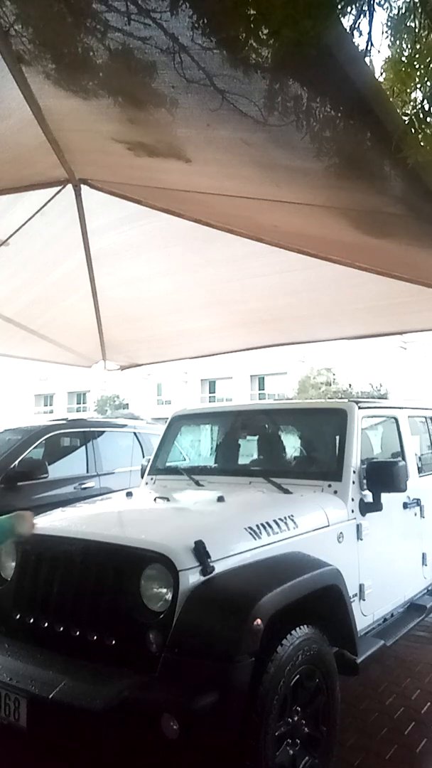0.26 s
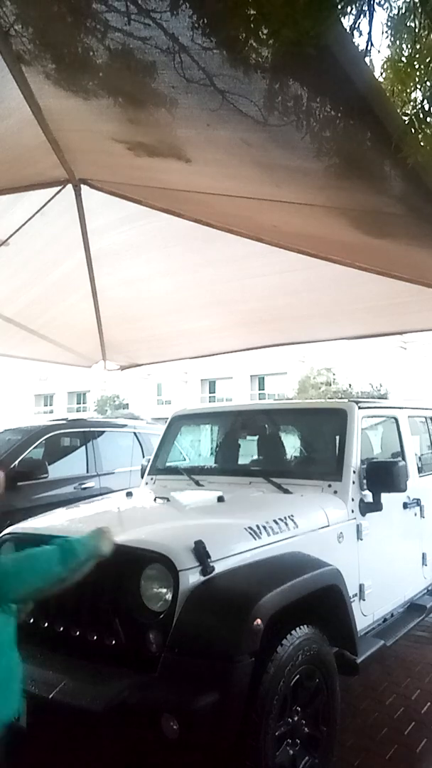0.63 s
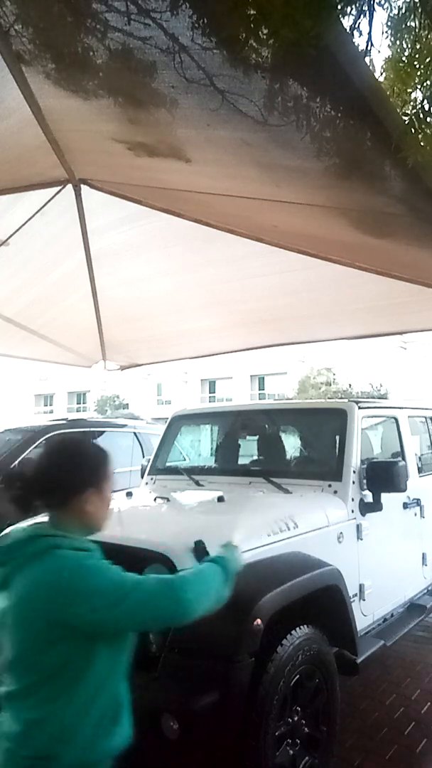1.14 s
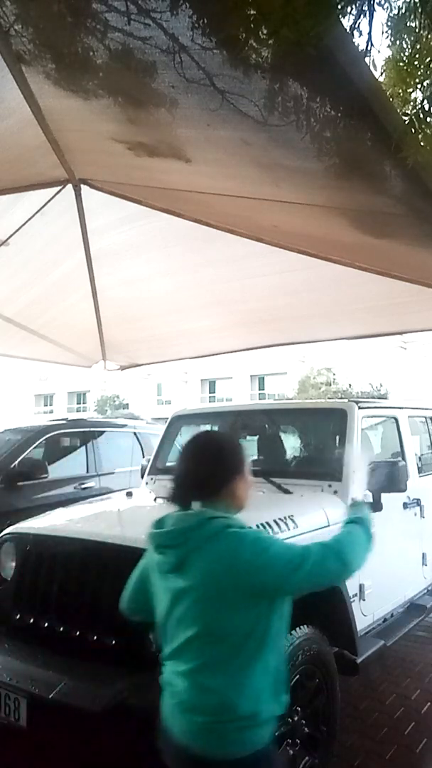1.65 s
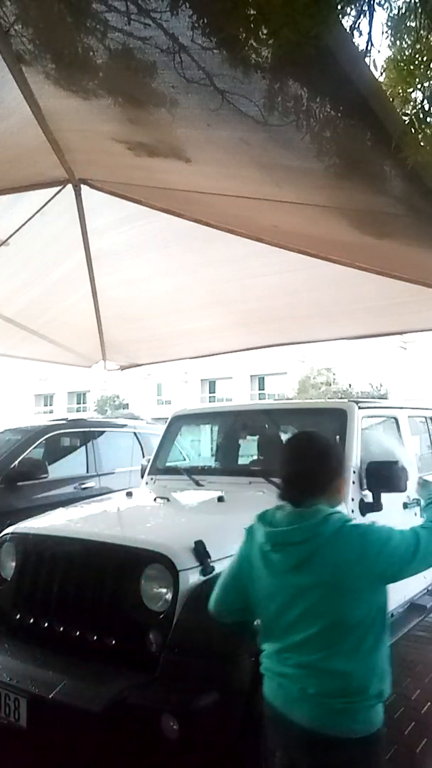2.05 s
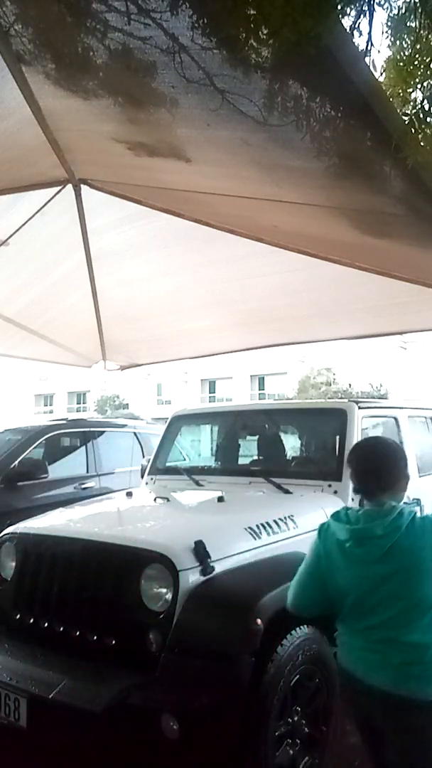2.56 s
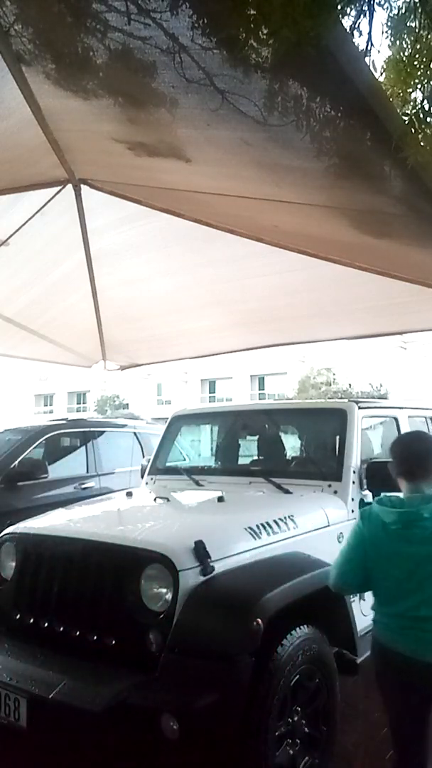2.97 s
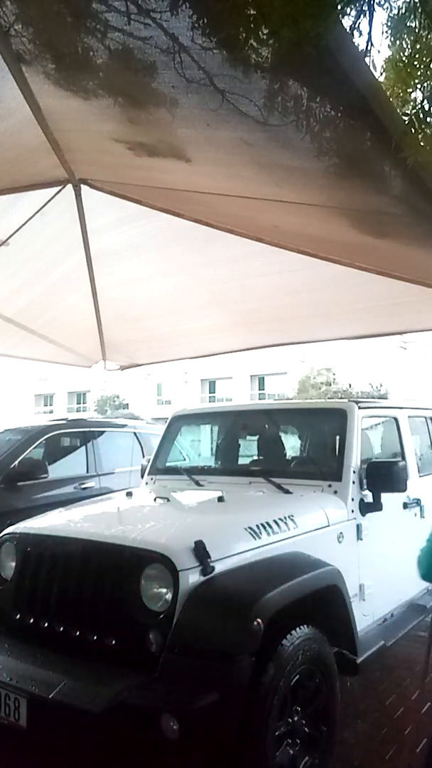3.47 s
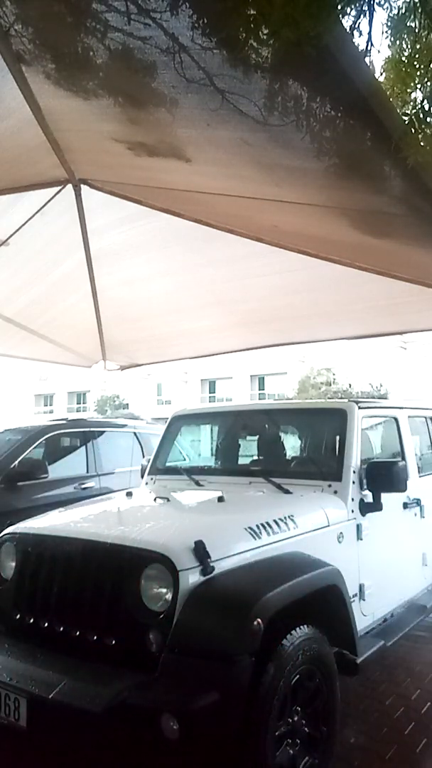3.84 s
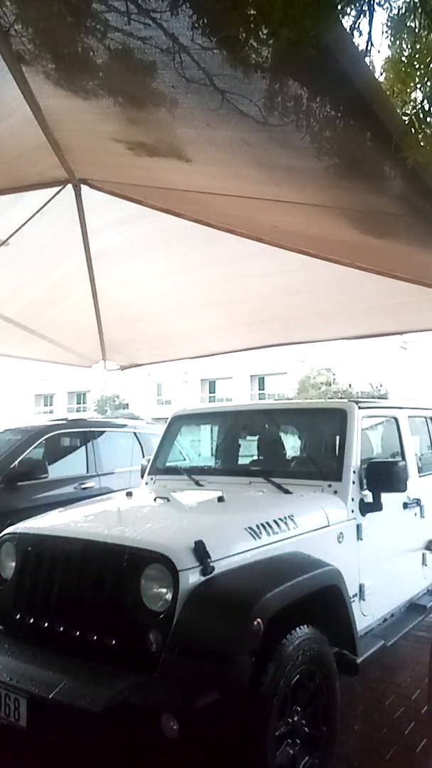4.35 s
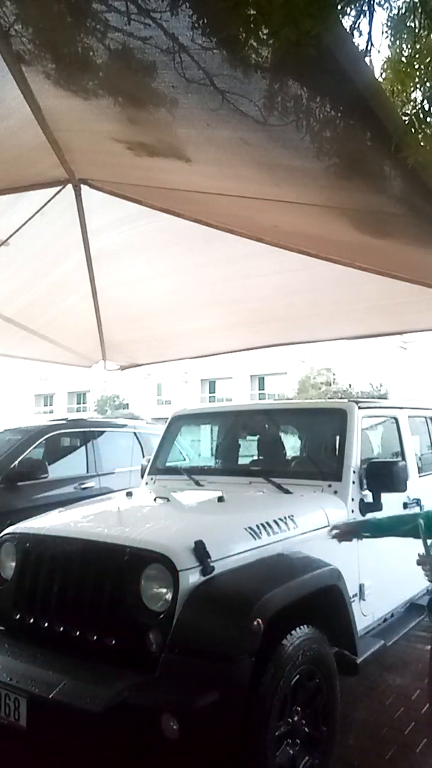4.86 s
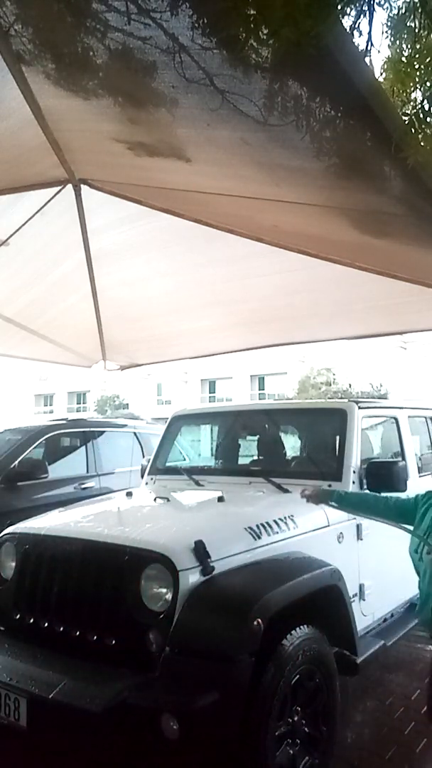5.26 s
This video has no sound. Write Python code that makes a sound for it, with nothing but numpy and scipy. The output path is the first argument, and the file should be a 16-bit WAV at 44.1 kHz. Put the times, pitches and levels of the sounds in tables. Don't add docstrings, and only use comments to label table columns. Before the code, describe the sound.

A garden hose sprays a parked car under a fabric canopy. Bright, crackling spatter and fine hiss flutter in irregular surges, with single drops ticking sharply. Around the middle and later the jet strikes sheet metal in short hollow drumming blows, then the spray thins to sparse patter. Faint traffic and water runoff rumble below. A phone a few metres away captures it in stereo, the right side brighter and louder.

```python
import sys
import numpy as np
from scipy import signal
from scipy.fft import rfft, irfft
from scipy.io import wavfile
from scipy.ndimage import uniform_filter1d

SR = 44100
rng = np.random.default_rng(int(sys.argv[2]) if len(sys.argv) > 2 else 0)


def amplitude_ratio(level_db):
    exponent = np.asarray(level_db, float) / 20
    return 10 ** exponent


def wav_out(sig):
    wavfile.write(sys.argv[1], SR, np.round(np.clip(np.atleast_2d(sig).T, -1, 1) * 32767).astype(np.int16))


N = 242991
TIME = np.arange(N) / SR
HZ = np.arange(N // 2 + 1) * SR / N + 1


def along(table, column=1):
    rows = np.array(table, float)
    return np.interp(np.log(HZ), np.log(rows[:, 0]), rows[:, column])


def colour(x, table):
    inside = (HZ > table[0][0]) & (HZ < table[-1][0])
    y = irfft(rfft(x) * amplitude_ratio(along(table)) * inside, N)
    right_rms = np.sqrt(np.mean(y[1] ** 2))
    return y / right_rms


# (frequency [Hz], shading [dB], likeness [0-1])
PORT = [(60, -2.5, 1), (505, -2.5, 0.94), (1020, -4.5, 0.28), (2850, -2.5, 0.32), (4000, -7.5, 0.12),
        (6000, -5, 0), (8000, -13, 0.1), (9200, -7.5, 0), (11050, -19, 0.1), (13500, -43, .1),
        (15000, -37, .1)]


def pair():
    like = np.clip(along(PORT, column=2), 0, 1)
    right, other = rfft(rng.standard_normal((2, N)))
    left = like * right + np.sqrt(1 - like ** 2) * other
    return irfft(np.array([left, right]), N)


def walk(rate_hz):
    hold = int(SR / rate_hz)
    steps = np.repeat(rng.standard_normal(N // hold + 1), hold)
    smooth = uniform_filter1d(uniform_filter1d(steps, hold), hold)
    return 1.15 * smooth[:N]


def fade(x, ms):
    return signal.lfilter([1], [1, -np.exp(-1000 / (ms * SR))], x)


def patter(rate, spread_db, ms):
    chance, luck = rng.random((N, 2)).T
    size = amplitude_ratio(-2 * spread_db * np.log(1 - luck))
    power = fade((chance < rate / SR) * size, ms)
    return power / power.mean()


# (frequency [Hz], density [dB per Hz])
TOWN = [(18, -73), (30, -31), (93, -4), (130, -8), (173, -6.5), (269, -11), (301, -9.5), (501, -12),
        (572, -15.5), (639, -10.5), (872, -13.5), (2420, -30.5), (2640, -34.5), (3370, -37), (6000, -29),
        (7800, -57), (13200, -120)]


def town():
    level_db = -51.5 + 0.33 * walk(rate_hz=1.75)
    return amplitude_ratio(level_db) * colour(pair(), TOWN)


# (time [s], splash level [dB], mist minus splash [dB], fat drops minus splash [dB])
JET = [(0.0, -52, -4, -9), (0.04, -46.5, -12, -10), (0.09, -53.5, -3, -2), (0.21, -49.5, -6, -12),
       (0.23, -53, 1, -7), (0.24, -47.5, -16, -16), (0.28, -55, -6, -15), (0.29, -43.5, 4, -14),
       (0.32, -48, -8, -7.5), (0.41, -46.5, -7, -11.5), (0.66, -48.5, -6, -11.5), (0.71, -41.5, -9, -14.5),
       (0.78, -52.5, -6, -6.5), (0.9, -42.5, -7, -15), (1.21, -45, -6, -10), (1.23, -40.5, -12, -14),
       (1.26, -48, -5, -9), (1.52, -42.5, -1, -17), (1.58, -46.5, -3, -12), (1.6, -41, -10, -15),
       (1.66, -45.5, 1, -15), (1.7, -51.5, -4, -9), (1.76, -49, -7, -10), (1.9, -50.5, -5, -15),
       (1.99, -45.5, -8, -18), (2.04, -49, -6, -11), (2.35, -43, -9, -14.5), (2.36, -49.5, -4, -9.5),
       (2.47, -39.5, -9, -12), (2.62, -49, -6, -10.5), (2.73, -51, -1, -12), (2.79, -45, -7, -11),
       (2.82, -52.5, -1, -8.5), (2.99, -46, -4, -13.5), (3.11, -55, -1, -10), (3.13, -58, -3, -10),
       (3.18, -50.5, -6, -16), (3.31, -58.5, -3, -14), (3.38, -40, -2, -12), (3.47, -43.5, -2, -8),
       (3.54, -40, -2, -30), (3.65, -48, -4, -12), (3.68, -43, -7, -15), (3.74, -39, -1, -15.5),
       (3.79, -41, -7, -17), (3.85, -52.5, -1, -8.5), (3.99, -39.5, -6, -13.5), (4.1, -41.5, -3, -7),
       (4.16, -48, -2, -17), (4.17, -45, -10, -6), (4.26, -54.5, 0, -5.5), (4.28, -46.5, -18, -13),
       (4.36, -58, -1, -12), (4.39, -43.5, -6, 1), (4.42, -51.5, -7, -7), (4.47, -43.5, -11, -7),
       (4.5, -49.5, -7, -11), (4.59, -45.5, -12, -3), (4.64, -52.5, -8, -10.5), (4.73, -45.5, -13, -15),
       (4.74, -49.5, -11, 0.5), (4.85, -60.5, -6, -11), (4.97, -61.5, -7, -4), (5.02, -51.5, -19, -6),
       (5.06, -54.5, -12, -9), (5.17, -57, -3, -7.5), (5.19, -52.5, -15, -3), (5.26, -59, -7, -10),
       (5.4, -55, -9, -7), (5.51, -55, -15, 0)]
# (frequency [Hz], density [dB per Hz])
SPLASH = [(2470, -36), (4200, -15.5), (4920, -13), (6280, 0), (7360, -1), (8620, -0.5), (12600, -9.5),
          (13500, -12.5), (14200, -12)]
# (frequency [Hz], density [dB per Hz])
FAT = [(1500, -9), (2400, -8.5), (3500, -2), (4800, 1), (6000, -3)]
# (frequency [Hz], density [dB per Hz])
MIST = [(13300, -30), (14000, -16), (14600, -12), (15400, -12), (15900, -3)]


def spray():
    s, *columns = np.transpose(JET)
    splash_db, mist_db, fat_db = (np.interp(TIME, s, column) for column in columns)
    slugs = 0.67 + 0.31 * patter(rate=60, spread_db=2.0, ms=8.2)
    drops = patter(rate=900, spread_db=3.5, ms=0.38)
    fat_drops = patter(rate=300, spread_db=3, ms=1.5)
    splash = colour(pair() * np.sqrt(slugs * (0.7 + 0.34 * drops)), SPLASH)
    mist = colour(pair() * np.sqrt(slugs * (0.84 + 0.25 * drops)), MIST)
    fat = colour(pair() * np.sqrt(slugs * (0.62 + 0.34 * fat_drops)), FAT)
    flutter = amplitude_ratio(1.72 * walk(rate_hz=25.014))
    mixture = splash + amplitude_ratio(mist_db + 2.0) * mist + amplitude_ratio(fat_db) * fat
    return amplitude_ratio(splash_db + 5.5) * flutter * mixture


# (time [s], peak level [dB], ring frequency [Hz])
DROPS = [(0.0413, -38, 3610), (0.0413, -41, 6530), (0.1513, -33, 6900), (0.2066, -30, 7310),
         (0.2468, -35, 9370), (0.2473, -29, 8460), (0.2861, -21, 8700), (0.2942, -27, 9080),
         (0.4792, -25.5, 8930), (0.5048, -31, 8500), (0.5605, -33, 8300), (0.597, -28, 6200),
         (0.61, -24, 8800), (0.6674, -33, 7210), (0.6878, -25, 6430), (0.8709, -31, 8400),
         (0.9218, -29, 5970), (0.9455, -22, 6400), (1.0231, -24, 6050), (1.1149, -34, 6030),
         (1.1766, -28, 6520), (1.2805, -27.5, 8700), (1.3314, -29, 9020), (1.3927, -25, 8950),
         (1.468, -35, 6670), (1.489, -27, 8810), (1.5933, -36, 9140), (1.5933, -30, 6590),
         (1.745, -25.5, 8150), (1.9505, -40, 6960), (1.9934, -29, 8890), (2.0946, -26, 5820),
         (2.1854, -26, 8890), (2.2189, -39, 7610), (2.2786, -25, 6710), (2.4254, -37, 8080),
         (2.4473, -34, 5720), (2.7807, -26, 8500), (2.974, -31, 9310), (3.131, -27, 7840),
         (3.36, -35, 7430), (3.3732, -30, 9590), (3.5813, -33, 6690), (3.6706, -36, 7310),
         (3.6706, -33, 7990), (3.7638, -29, 7530), (3.8124, -25, 6860), (4.0751, -21, 9500),
         (4.177, -34, 7580), (4.1984, -28, 7500), (4.2826, -22.5, 7760), (4.3814, -23, 7640),
         (4.3854, -30, 3750), (4.4283, -26, 6230), (4.5428, -24.5, 7510), (4.6972, -28, 6260),
         (4.7258, -19, 6450), (4.9896, -33, 5530), (5.02, -33, 7290), (5.1856, -27, 6640)]


def lone_drops():
    out = np.zeros((2, N))
    hiss = colour(pair(), SPLASH)
    t = np.arange(800) / SR
    crack = np.exp(-t / 0.0011) + 0.19 * np.exp(-t / 0.006)
    for s, db, hz in DROPS:
        i = int(s * SR)
        n = min(len(t), N - i)
        ring = np.sin(2 * np.pi * hz * t) * np.exp(-t / 0.0017)
        burst = 0.7 * ring[:n] + 0.28 * crack[:n] * hiss[:, i:i + n]
        out[:, i:i + n] += amplitude_ratio(db + 0.5) * burst
    return out


# (time [s], level [dB])
DRUMMING = [
    [(2.3, -72), (2.376, -70), (2.382, -76), (2.476, -70), (2.594, -79), (2.6, -58)],
    [(3.3, -70), (3.324, -67), (3.418, -45), (3.484, -45.5), (3.58, -61), (3.62, -61)],
    [(3.64, -71), (3.672, -61.5), (3.746, -52), (3.776, -62), (3.85, -60)],
    [(3.9, -64), (4.086, -52.5), (4.114, -59), (4.17, -57), (4.23, -72), (4.25, -74)],
    [(4.35, -57), (4.358, -83), (4.384, -47.5), (4.46, -59.5), (4.74, -79), (4.746, -66), (4.8, -79)],
]
# (frequency [Hz], density [dB per Hz])
PANEL = [(120, -51), (200, -21), (299, -10.5), (339, -3.5), (573, -7.5), (595, -11.5), (1230, -16),
         (1960, -18.5), (2140, -16.5), (4000, -22), (5200, -54), (8800, -120)]


def panel():
    gain = np.zeros(N)
    for rows in DRUMMING:
        s, db = np.transpose(rows)
        gain += amplitude_ratio(np.interp(TIME, s, db, left=-120, right=-120))
    gain = uniform_filter1d(gain, size=400)
    blows = np.sqrt(0.5 + 0.39 * patter(rate=250, spread_db=2.0, ms=3.3))
    return amplitude_ratio(6.0) * gain * colour(pair() * blows, PANEL)


def scene():
    left, right = town() + spray() + lone_drops() + panel()
    left_lead = 37
    return np.array([np.roll(left, -left_lead), right])


def top_cut(x):
    return signal.sosfilt(signal.butter(12, 16830, fs=SR, output="sos"), x)


def record(dry):
    left = irfft(rfft(dry[0]) * amplitude_ratio(along(PORT)), N)
    top_hz = 15600
    low_pass = signal.ellip(10, 0.2, 60, top_hz, fs=SR, output="sos")
    mix = signal.sosfilt(low_pass, [left, dry[1]])
    return top_cut(mix)


dry = scene()
out = record(dry)
wav_out(out)
```